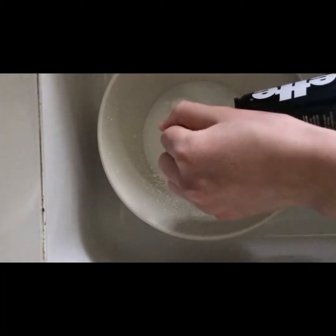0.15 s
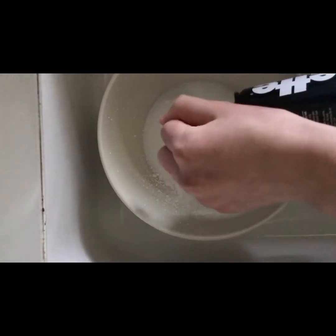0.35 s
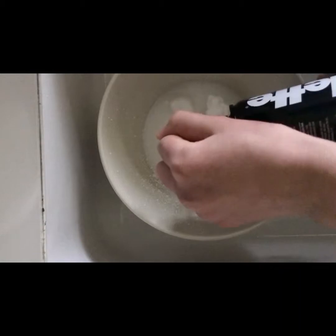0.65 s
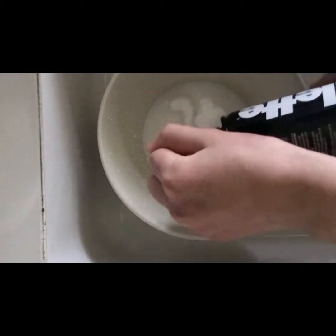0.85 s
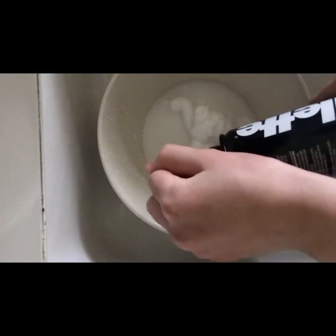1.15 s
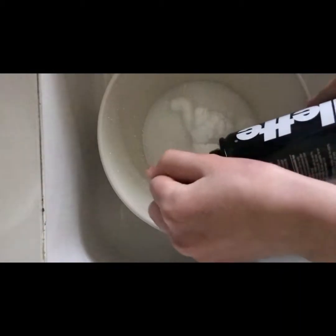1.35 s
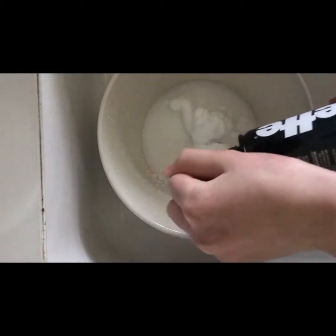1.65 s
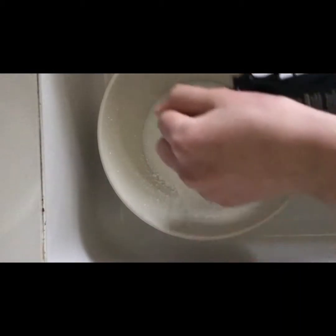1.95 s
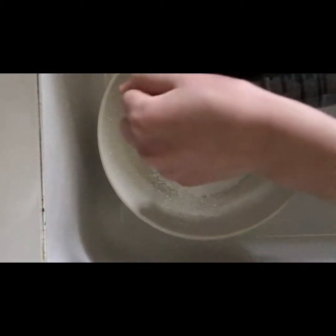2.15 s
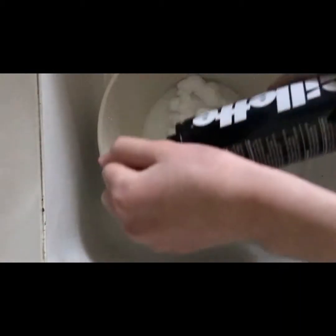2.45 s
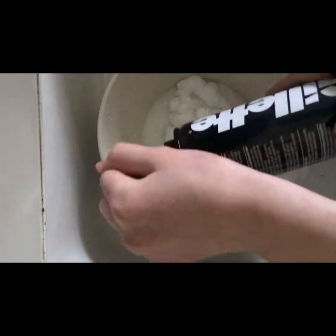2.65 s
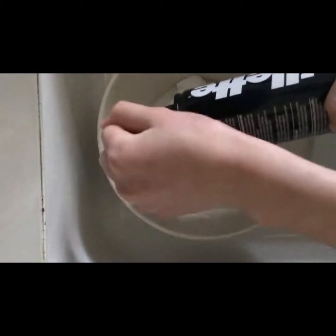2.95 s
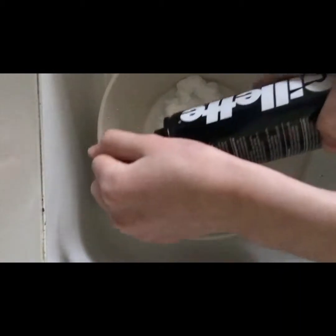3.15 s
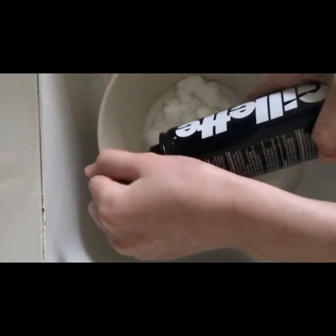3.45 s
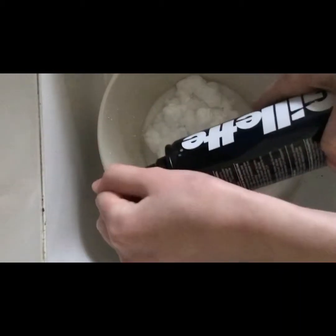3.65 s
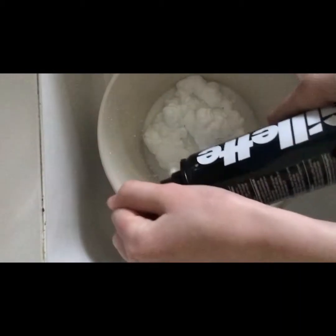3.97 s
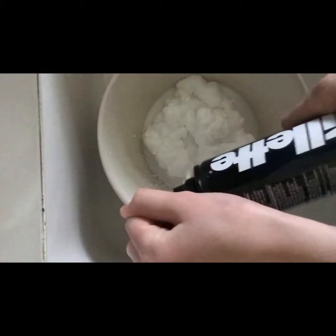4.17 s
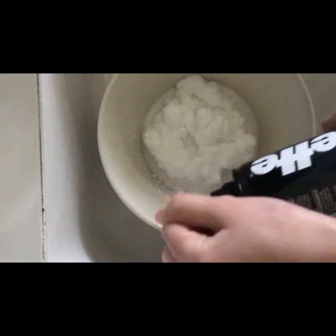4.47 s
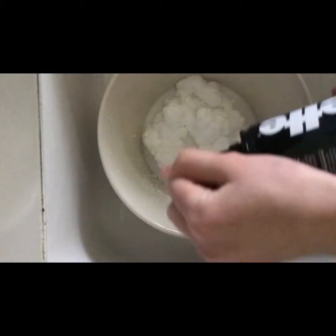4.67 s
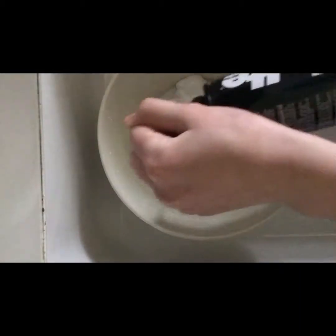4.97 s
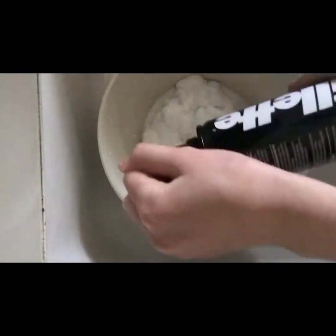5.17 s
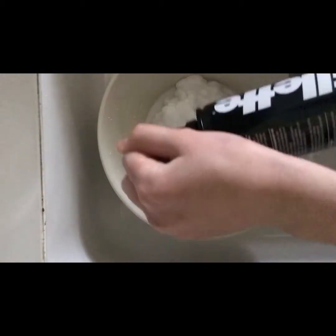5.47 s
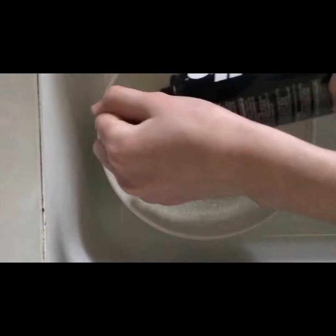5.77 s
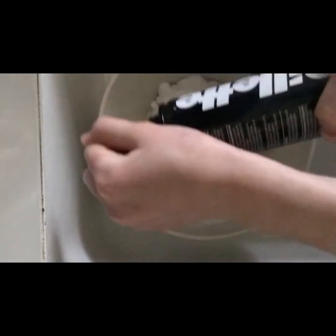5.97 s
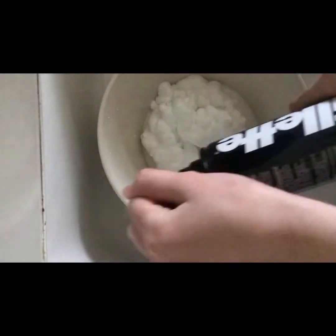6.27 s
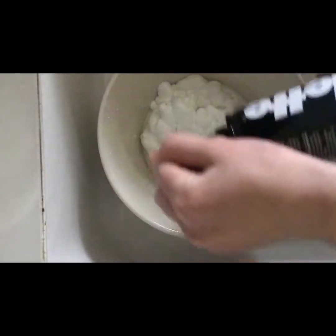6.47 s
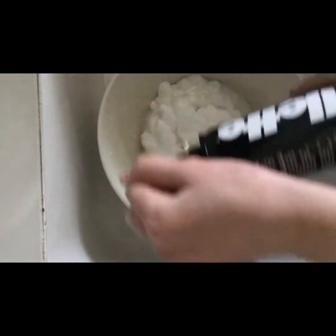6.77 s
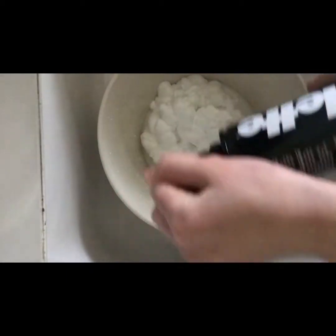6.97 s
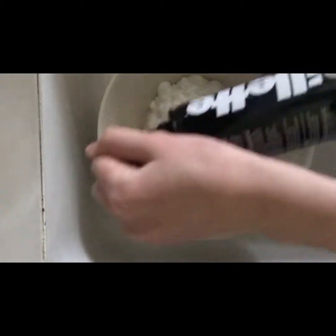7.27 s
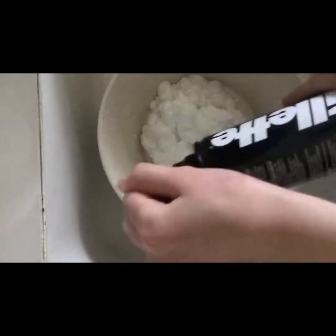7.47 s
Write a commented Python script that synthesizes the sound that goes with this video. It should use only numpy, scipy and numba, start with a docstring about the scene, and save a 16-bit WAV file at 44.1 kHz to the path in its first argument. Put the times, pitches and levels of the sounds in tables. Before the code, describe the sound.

Shaving foam sprays continuously from a can into a bowl in a sink. It is a bright, wet, crackly sputter with fine fizz and sharp spits, densest in the first two seconds. The bowl's hollow ring weakens as foam covers the bottom, and the tone shifts as the hand circles. Close microphone, short hard echoes, faint low hum and air behind.

```python
"""Shaving foam sputters from a spray can in one long spray and piles up in a bowl standing in a sink.
Gas pockets burst out of the nozzle in quick uneven spurts: filtered clicks, pitched by pocket size, over fine fizz.
Sharp spits stand out. The bowl rings along, and moving resonances colour the foam as the hand circles above it.
Behind it are a faint gas hiss, a motor hum of steady tones, moving air and rumble, and brief rubs on the can."""
import sys
import numpy as np
from scipy import signal
from scipy.fft import rfft, irfft, next_fast_len
from scipy.io import wavfile
from scipy.ndimage import uniform_filter1d
from numba import njit

SR = 44100
rng = np.random.default_rng(int(sys.argv[2]) if len(sys.argv) > 2 else 0)


def to_wav(sig):
    """Store sig (one row per channel, or 1-D mono) as 16-bit WAV at the path in sys.argv[1].

    Samples outside -1..1 are clipped; the rate is SR.
    """
    pcm = np.clip(np.atleast_2d(sig), -1, 1) * 32767
    pcm = np.round(pcm).astype(np.int16)
    wavfile.write(sys.argv[1], SR, pcm.T)  # frames by channels


N = 335895


def from_db(db):
    """Turn decibels into a gain."""
    return 10 ** (np.asarray(db) / 20)


def rms_one(x):
    """Scale a sound to an average strength (rms) of 1."""
    return x / np.sqrt(np.mean(x ** 2) + 1e-20)


def in_time(rows):
    """Draw straight lines between the rows of a table: one curve for each column after the time."""
    s, *columns = np.transpose(rows)
    return [np.interp(np.arange(N) / SR, s, column) for column in columns]


def gain_in_time(rows):
    """Turn a table of time and dB into one gain curve."""
    return from_db(in_time(rows)[0])


def swell(s, length_s):
    """A smooth rise to 1 at time s and back to 0."""
    first = max(int((s - length_s / 2) * SR), 0)
    last = min(int((s + length_s / 2) * SR), N)
    near = np.arange(first, last)
    out = np.zeros(N)
    out[near] = np.cos(np.pi * (near / SR - s) / length_s) ** 2
    return out


def wander(per_s):
    """Slow chance ups and downs with rms 1."""
    steps = np.arange(N) / SR * per_s
    return rms_one(np.interp(steps, np.arange(1000), rng.standard_normal(1000)))


def band(x, low_hz, high_hz, order=2):
    """Keep only the pitches between two limits."""
    limits = [low_hz, min(high_hz, SR / 2 - 1)]
    return signal.sosfilt(signal.butter(order, limits, "band", fs=SR, output="sos"), x + 1e-18)


def coloured(x, spectrum):
    """Give x a smooth spectrum and rms 1."""
    hz, db = np.transpose(spectrum)
    size = next_fast_len(N)
    bins = np.maximum(np.arange(size // 2 + 1) * SR / size, 1)
    gains = from_db(np.interp(np.log(bins), np.log(hz), db))
    return rms_one(irfft(rfft(x, size) * gains, size)[:N])


def resonance(x, hz, width_hz):
    """A space that rings at one pitch (two-pole filter, gain 1 on top); a narrow width rings longer."""
    r = np.exp(-np.pi * width_hz / SR)
    inputs = np.array([1, 0, -1]) * (1 - r * r) / 2
    feedback = [1, -2 * r * np.cos(2 * np.pi * hz / SR), r * r]
    return signal.lfilter(inputs, feedback, x + 1e-18)


@njit
def glide(x, turn, r):
    """The same ringing filter with a moving pitch (turn in radians per sample)."""
    y = np.zeros(len(x))
    for i in range(2, len(x)):
        driven = (1 - r * r) / 2 * (x[i] - x[i - 2])
        y[i] = driven + (1 + r * r) * np.cos(turn[i]) * y[i - 1] - r * r * y[i - 2]
    return y


def moving_resonance(x, hz, width_hz):
    """A resonance that follows a pitch curve in Hz."""
    return glide(x, 2 * np.pi * hz / SR, np.exp(-np.pi * width_hz / SR))


def foam():
    """One surging flow drives sputter, fizz and ringing; spits join in, and all but the ringing echoes."""
    *pocket_levels, fizz_level = supply()
    surge = spurts(per_s=130, spread_db=3.5, fade_s=0.0028)
    hiss = from_db(-3.5) * sputter(surge, pocket_levels) + fizz_level * crackle(surge)
    echoed = sink(hiss + spits(), early_db=-5.0, early_t60=0.012, late_db=-8.0, late_t60=0.034)
    return hand_shadow(echoed + ringing(surge))


# Flow through the valve; thinner foam tears into smaller pockets: t/s, flow level/dB, thinness/dB
VALVE_FLOW = [(0.0, 5.5, -16), (0.45, 1, 0.5), (0.85, 1.2, 6), (1.05, 3, 7.5), (1.45, 1.5, 6.5),
              (1.65, 2.5, -2.5), (1.9, 0.3, -1.5), (2.28, 1.5, -6.5), (2.65, 1.6, -12.5), (3.3, -0.65, 8),
              (3.95, 0.2, -6), (4.5, -0.9, 7), (4.9, -0.5, 0.8), (5.25, 2.2, -12), (5.95, -4, 8),
              (6.45, 1.5, -3.5), (6.95, 0.9, -3.5), (7.62, -3, 5)]
# Half-clogged nozzle, nearly always a dip: t/s at the middle, length/s, level change/dB
NOZZLE_CLOGS = [(0.078, 0.072, -3.5), (1.093, 0.035, -4), (1.29, 0.027, -3.5), (2.228, 0.1, -1.5),
                (2.85, 0.043, 1), (3.224, 0.046, -5), (3.6, 0.058, -6), (5.083, 0.07, -4), (5.2, 0.18, -4),
                (5.638, 0.1, -3), (5.91, 0.037, -3), (6.01, 0.063, -3), (6.694, 0.05, -1),
                (7.314, 0.07, -1.5)]
# Gushes of foam, nearly all lifts: t/s at the crest, length/s, level change/dB, f/Hz of most pockets,
# spread/octaves
FOAM_GUSHES = [(0.198, 0.074, 9.5, 4660, 0.34), (0.452, 1.1, 6.5, 2750, 0.095),
               (0.454, 0.045, 9, 4630, 0.29), (0.503, 0.08, 7, 4000, 0.093),
               (0.573, 0.093, 8.5, 4000, 0.13), (0.751, 0.05, 9, 4000, 0.23), (0.87, 0.027, 8, 2630, 0.22),
               (1.01, 0.13, 3, 4900, 0.14), (1.145, 0.04, 6, 3350, 0.25), (1.225, 0.06, 10, 3460, 0.33),
               (1.426, 0.14, 5.5, 3650, 0.6), (1.455, 0.2, 6, 4730, 0.13), (1.642, 0.065, 8, 2680, 0.13),
               (1.742, 0.079, 11, 4480, 0.11), (1.877, 0.31, 10.5, 4430, 0.13),
               (1.95, 0.68, 5, 2750, 0.075), (2.046, 0.12, 11, 4000, 0.074), (2.148, 0.21, 8.5, 4330, 0.12),
               (2.3, 0.11, 2.5, 3200, 0.11), (2.49, 0.36, 9.5, 4930, 0.16), (2.587, 0.1, 6, 3350, 0.21),
               (2.698, 0.24, 11, 4200, 0.19), (2.915, 0.04, 7, 3800, 0.15), (2.955, 0.024, 15, 4600, 0.14),
               (3.03, 0.18, 9, 4240, 0.14), (3.136, 0.03, 8, 3950, 0.13), (3.375, 0.058, 15.5, 3350, 0.13),
               (3.54, 0.014, -4, 3000, 0.5), (3.65, 0.47, 5.5, 3980, 0.087), (3.9, 0.05, 6, 3300, 0.17),
               (3.98, 0.86, 3, 2200, 0.092), (4.052, 0.07, 4.5, 3350, 0.63), (4.12, 0.079, 4, 2200, 0.55),
               (4.323, 0.12, 8, 2920, 0.3), (4.375, 0.086, 9.5, 5100, 0.12), (4.435, 0.14, 10, 2680, 0.31),
               (4.53, 0.55, 5, 4780, 0.081), (4.537, 0.031, 10, 5100, 0.099),
               (4.576, 0.069, 8.5, 2360, 0.2), (4.688, 0.2, 6.5, 5200, 0.13),
               (4.662, 0.12, 7.5, 2480, 0.25), (4.76, 0.094, 3.5, 2510, 0.35),
               (4.782, 0.075, 12, 3350, 0.25), (4.984, 0.16, 7.5, 3000, 0.12), (5.15, 0.32, 4, 3350, 0.081),
               (5.572, 1.06, 5.5, 3350, 0.21), (5.809, 0.13, 9, 3540, 0.41), (5.87, 0.064, 9, 5260, 0.18),
               (6.15, 1.4, 3, 2200, 0.1), (6.079, 0.078, 10, 3700, 0.12), (6.257, 0.2, 7.5, 3660, 0.11),
               (6.4, 0.045, 6.5, 3650, 0.64), (6.51, 0.16, 7.5, 3670, 0.31),
               (6.772, 0.045, 17.5, 5200, 0.16), (6.845, 0.43, 8.5, 3180, 0.089),
               (7, 0.18, 8.5, 5280, 0.15), (7.085, 0.1, 10, 4000, 0.12), (7.101, 0.093, 9, 2990, 0.12),
               (7.225, 0.28, 9.5, 3200, 0.11), (7.263, 0.06, 7, 5150, 0.26), (7.54, 0.62, 10.5, 3676, 0.11)]
# Pocket sizes, large to small, then the finest fizz: f/Hz, level/dB, share of the flow's swing,
# share of the thinness
POCKET_SIZES = [(2210, -49.5, 0.54, 0.048), (2750, -53, 2.2, 0.14), (3350, -52.5, 0.56, -0.35),
                (3980, -51, 2.06, 0.29), (4780, -52.5, 2.06, 0.59), (5960, -62.5, 1.7, 0.43)]
UNEVEN_DB, UNEVEN_PER_S = 2, 24  # rms of the chance swings in each size's supply; new values per second


def supply():
    """The gain of each pocket size follows flow and thinness, clogs, and gushes near its own pitch."""
    flow_db, thin_db = in_time(VALVE_FLOW)
    flow_db = flow_db + sum(db * swell(s, length_s) for s, length_s, db in NOZZLE_CLOGS)
    _, _, lift_db, gush_hz, octaves = np.transpose(FOAM_GUSHES)
    size_hz = np.array(POCKET_SIZES)[:, :1]
    nearness = np.exp(-.5 * (np.log2(size_hz / gush_hz) / octaves) ** 2)
    # the size nearest to a gush's pitch gets its whole change
    shares_db = lift_db * nearness / nearness.max(axis=0)
    gushes_db = shares_db @ np.array([swell(s, length_s) for s, length_s, *_ in FOAM_GUSHES])
    gains = []
    for (_, level_db, follows, thins), gush_db in zip(POCKET_SIZES, gushes_db):
        steady_db = level_db + follows * flow_db + thins * thin_db
        gains.append(from_db(steady_db + gush_db + UNEVEN_DB * wander(UNEVEN_PER_S)))
    return gains


def spurts(per_s, spread_db, fade_s):
    """Gas power from uneven pockets: each opens at once and empties; the valve holds the mean near 1."""
    born = rng.random(N) < per_s / SR
    sizes = from_db(spread_db * np.clip(rng.standard_normal(N), -2, 2)) ** 2
    power = signal.lfilter([1], [1, -np.exp(-2 / (fade_s * SR))], born * sizes + 1e-9)
    return power / uniform_filter1d(power, SR // 16)


def tearing(power, films_per_s):
    """Foam films snap as tiny random clicks, as strong as the gas flow behind them."""
    snaps = rng.random(N) < films_per_s / SR
    return np.sqrt(power) * snaps * rng.standard_normal(N)


TICKS_PER_S, TICK_RANGE_DB, TICK_DB = 150, 18, -4  # rate, spread of strengths, level against the tearing


def ticks():
    """Skins of foam burst at random, each with one crisp click that reaches all sizes at once."""
    bursts = rng.random(N) < TICKS_PER_S / SR
    strengths = from_db(-TICK_RANGE_DB * rng.random(N)) * rng.choice([-1, 1], N)
    return band(bursts * strengths, POCKET_BANDS[0][0], POCKET_BANDS[-1][1], order=3)


def bubbles(low_hz, high_hz, per_s, cycles, count=8):
    """Single bubbles burst and ring for a few cycles, each at one of several pitches."""
    strengths = from_db(-12 * rng.random(N))
    clicks = (rng.random(N) < per_s / SR) * strengths
    dealt = rng.integers(0, count, N)  # which pitch each bubble gets
    pitches = np.geomspace(low_hz, high_hz, count + 2)[1:-1]
    return rms_one(sum(resonance(clicks * (dealt == k), hz, hz / cycles) for k, hz in enumerate(pitches)))


# Fixed resonances of can and bowl: f/Hz, width/Hz, boost level/dB
CAN_AND_BOWL = [(2300, 80, 3), (2580, 110, 5), (2720, 90, 2), (2920, 110, 3), (3140, 120, 4), (3310, 70, 3),
                (3510, 80, 4), (4350, 110, 3), (5010, 140, 3), (5330, 80, 8), (6450, 130, 3)]


def hollows(x):
    """The spaces around the nozzle lift their own pitches."""
    for hz, width_hz, boost_db in CAN_AND_BOWL:
        x = x + (from_db(boost_db) - 1) * resonance(x, hz, width_hz)
    return x


def pockets(surge, clicks, low_hz, high_hz, pops_db, count):
    """One size class: foam tears partly with the common surge, partly alone; bubbles and skins burst in it."""
    edges, torn = np.geomspace(low_hz, high_hz, count + 1), 0
    together = 0.45  # share of the flow that all sizes have in common
    kin = spurts(per_s=150, spread_db=1.0, fade_s=0.0038)
    for low, high in zip(edges, edges[1:]):
        own = spurts(per_s=1500, spread_db=0.5, fade_s=0.008)
        flow = together * surge + (1 - together) * kin * own
        # a pocket takes about a millisecond to open
        power = np.abs(uniform_filter1d(flow, SR // 650))
        torn = torn + band(tearing(power, films_per_s=7000), low, high)
    pops = band(bubbles(low_hz, high_hz, per_s=140, cycles=12.0), low_hz, high_hz, order=1)
    skins = rms_one(band(clicks, low_hz, high_hz, order=1))
    return hollows(rms_one(torn) + from_db(pops_db) * pops + from_db(TICK_DB) * skins)


# The band in which each size tears: low f/Hz, high f/Hz, level/dB of single pops against the tearing
POCKET_BANDS = [(2016, 2530, -4), (2455, 3120, -19.5), (2915, 3550, -16.5), (3702, 4314, -18),
                (4370, 5110, -5.5)]
# Five moving resonances of the space under the circling hand, low to high; each a list of: t/s, f/Hz
HAND_PITCHES = [
    [(0, 2120), (1.7, 2206), (2.7, 2245), (3.3, 2175), (4.1, 2230), (4.65, 2045), (5.3, 2160), (5.95, 2150),
     (6.45, 2116), (7, 2070), (7.62, 2200)],
    [(0, 2870), (1.1, 2840), (1.65, 2460), (2.05, 2600), (3.2, 2520), (4.4, 2480), (5, 2770), (5.5, 2800),
     (7.62, 2800)],
    [(0, 3280), (2.3, 3250), (2.6, 3360), (4.8, 3350), (5.3, 3260), (5.8, 3200), (6.4, 3130), (7.62, 3150)],
    [(0, 4230), (.5, 4120), (1.1, 3900), (1.75, 3980), (2.1, 4040), (2.7, 3870), (4.8, 3900), (6.3, 3980),
     (7.62, 3850)],
    [(0, 4640), (.5, 4430), (.83, 5140), (1.03, 5260), (1.22, 4500), (1.45, 4360), (1.95, 4720),
     (2.7, 4760), (3.3, 4840), (4.35, 4560), (4.55, 4780), (7.62, 4780)],
]
# How those five ring: width/Hz, boost level/dB in the empty bowl, boost level/dB in the full bowl
HAND_RINGING = [(128, 12, 21), (200, 6, 8), (210, -6, 4), (190, 16, 6.5), (295, 8, 9)]
FILL_S = 9.4  # the heap grows steadily and would fill the bowl at this time


def sputter(surge, levels):
    """Each pocket size excites one moving resonance of the space under the hand."""
    filled, out = np.minimum(np.arange(N) / SR / FILL_S, 1), 0
    clicks = ticks()
    for tears, level, pitch, rings in zip(POCKET_BANDS, levels, HAND_PITCHES, HAND_RINGING):
        low_hz, high_hz, pops_db = tears
        width_hz, empty_db, full_db = rings
        x = pockets(surge, clicks, low_hz, high_hz, pops_db, count=2)
        boost = from_db(empty_db + (full_db - empty_db) * filled)
        x = x + (boost - 1) * moving_resonance(x, in_time(pitch)[0], width_hz)
        # the flow through the valve sets the loudness, whatever the resonance does
        loudness = np.sqrt(np.abs(uniform_filter1d(x * x, SR // 18)) + 1e-20)
        out = out + level * x / loudness
    return out


# Spectrum of the fizz: f/Hz, relative level/dB per Hz
FIZZ_COLOUR = [(4000, -35), (5600, 12.5), (6700, 8.5), (7500, 2.5), (9000, -0.5), (11000, -8), (13000, -10),
               (16000, -9)]


def crackle(surge, count=7):
    """Fizz: the finest bubbles burst in clusters, each pitch band largely on its own."""
    edges, out = np.geomspace(5200, 16000, count + 1), 0
    clusters = spurts(per_s=170, spread_db=0.0, fade_s=0.0092)
    for low, high in zip(edges, edges[1:]):
        own = spurts(per_s=200, spread_db=15.0, fade_s=0.023)
        # a cluster takes a few milliseconds to build up
        power = np.abs(uniform_filter1d(clusters * own, SR // 130))
        out = out + band(tearing(power * (surge + 0.25), films_per_s=9200), low, high)
    return rms_one(hollows(coloured(out, FIZZ_COLOUR)))


def bowl(surge, modes):
    """The sputter keeps a set of air resonances ringing."""
    drive = tearing(surge + 1.95, films_per_s=5000)
    rings = sum(from_db(db) * resonance(drive, hz, width_hz) for hz, width_hz, db in modes)
    return rms_one(band(rings, modes[0][0] * 0.944, modes[-1][0] * 1.232, order=4))


# Air resonances of bowl and sink, in three groups: f/Hz, width/Hz, relative level/dB
DEEP_AIR = [(797.3, 9.3, 12), (829, 31, 14), (894, 125, -1)]
UPPER_AIR = [(1051, 58, 3), (1304, 220, 2.5), (1475, 46, 11.5), (1797, 185, 7)]
SINK_AIR = [(507.3, 37, 0), (567.7, 35, 0)]
# How loud each group rings; foam covering the bottom damps the deep one: t/s, level/dB
DEEP_LEVEL = [(0, -51), (1.1, -52), (2.15, -54), (2.55, -58), (2.85, -57.5), (3.7, -62), (4.55, -61),
              (4.98, -55.5), (5.25, -61), (6.2, -62), (7.1, -60), (7.45, -68)]
UPPER_LEVEL = [(0, -52), (.95, -56.5), (1.3, -51), (2.05, -55.5), (2.3, -55.5), (3.05, -58), (3.8, -57),
               (4.35, -56), (4.6, -56), (5.65, -59), (5.9, -55.5), (6.45, -55), (6.7, -55), (7, -52.5),
               (7.35, -57), (7.62, -52)]
SINK_LEVEL = [(0, -63.5), (1, -63), (3.8, -61.5), (4.6, -64.5), (7.62, -66)]


def ringing(surge):
    """Bowl and sink ring with the flow; foam over the bottom weakens the bowl's deep ring unevenly."""
    deep = gain_in_time(DEEP_LEVEL) * bowl(surge, DEEP_AIR)
    upper = gain_in_time(UPPER_LEVEL) * bowl(surge, UPPER_AIR)
    return deep + upper + gain_in_time(SINK_LEVEL) * bowl(surge, SINK_AIR)


# The pitch that the echo from the hand cancels: t/s, f/Hz, depth (0 none, 1 whole)
HAND_ECHO = [(0, 1470, 0.9), (.9, 1435, 0.8), (1.8, 1330, 0.34), (2.2, 1130, 0.8), (2.45, 1120, 1),
             (2.7, 1050, 0.1), (3.05, 1080, 0.8), (3.45, 1780, 0.1), (4.05, 1780, 1), (5.2, 1120, 0.47),
             (6, 1900, 0.57), (6.7, 1410, 0.6), (7.62, 1600, 0.8)]


def hand_shadow(x):
    """The hand's echo cuts a moving gap into the spectrum."""
    hz, depth = in_time(HAND_ECHO)
    return x - depth * moving_resonance(x, hz, width_hz=400)


# Spectrum of the gas hiss: f/Hz, relative level/dB per Hz
GAS_COLOUR = [(3000, 12.3), (7000, 12.2), (10000, 2.1), (12000, 1), (14000, 4.9), (16000, 8.4)]


def propellant():
    """A faint smooth hiss of gas that weakens steadily as the can cools."""
    level = from_db(-58.0 - 0.44 * np.arange(N) / SR)  # loses 0.44 dB each second
    return level * coloured(rng.standard_normal(N), GAS_COLOUR)


# Steady tones of the motor: f/Hz, rms level/dB
MOTOR_TONES = [(90, -69), (99.7, -68.5), (120, -58)]
# Spectra of the room's air and of its rumble: f/Hz, relative level/dB per Hz
AIR_COLOUR = [(15, -51), (33, -24), (48, -6), (75, 4), (100, 1.5), (150, -3.5), (185, -5.5), (215, 3.5),
              (238, 0.5), (260, 6.5), (295, 3.5), (380, -6), (700, -21), (3000, -32.5)]
RUMBLE_COLOUR = [(15, -45), (30, -38), (45, 15.5), (70, -10), (85, 23), (110, 4), (130, 25), (150, -41),
                 (400, -35)]
# A low rumble that swells in the room: t/s, level/dB
RUMBLE_SWELL = [(0, -104), (3.4, -80), (4.5, -63), (5.8, -64), (6.3, -56), (6.5, -51), (6.7, -86),
                (7.1, -59), (7.62, -60)]


def room():
    """Motor hum from sine tones; moving air and a low rumble from filtered noise."""
    t = np.arange(N) / SR
    hum = 0
    for hz, db in MOTOR_TONES:
        hum = hum + np.sqrt(2) * from_db(db) * np.sin(2 * np.pi * (hz * t + rng.random()))
    air = from_db(-58.5) * coloured(rng.standard_normal(N), AIR_COLOUR)
    rumble = gain_in_time(RUMBLE_SWELL) * coloured(rng.standard_normal(N), RUMBLE_COLOUR)
    return hum + air + rumble


def sink(x, early_db, early_t60, late_db, late_t60, count=26):
    """Close echoes from the bowl, later ones from sink and walls; their pattern changes as the can moves."""
    t, out = np.arange(SR // 5) / SR, x.copy()
    early = from_db(-60 * t / early_t60) * (t > .0012)
    late = from_db(-60 * t / late_t60) * (t > .006)
    decay = from_db(early_db) * early / np.linalg.norm(early)
    decay = decay + from_db(late_db) * late / np.linalg.norm(late)
    place = np.linspace(0, count - 1, N)
    for k in range(count):
        # each place has its own echo pattern and fades into the next
        near = np.flatnonzero(np.abs(place - k) < 1)
        part = x[near] * np.cos((place[near] - k) * np.pi / 2)
        echo = signal.fftconvolve(part, decay * rng.standard_normal(len(t)))[:N - near[0]]
        out[near[0]:near[0] + len(echo)] += echo
    return out


# The loudest spits: t/s, level/dB before snap and puff are set, f/Hz, length/s
LOUD_SPITS = [(0.0173, -25.5, 3770, 0.002), (0.1045, -21.5, 3350, 0.0042), (0.1709, -27.5, 2790, 0.01),
              (0.2498, -25.5, 3880, 0.002), (0.398, -24.5, 3150, 0.0032), (0.4199, -26.0, 4310, 0.002),
              (0.454, -27.0, 4340, 0.0033), (0.5064, -29.0, 2790, 0.0068), (0.526, -29.5, 3980, 0.0026),
              (0.7475, -29.0, 3080, 0.0107), (0.8413, -28.0, 3720, 0.002), (1.0051, -23.0, 5010, 0.004),
              (1.0259, -25.5, 4870, 0.0102), (1.092, -26.0, 4390, 0.0051), (1.1091, -27.0, 3900, 0.0031),
              (1.1244, -21.5, 4050, 0.0081), (1.1329, -23.5, 3800, 0.0033), (1.228, -27.0, 3880, 0.012),
              (1.2425, -19.0, 4490, 0.0061), (1.2676, -23.5, 4530, 0.0044), (1.3081, -26.5, 4590, 0.0038),
              (1.3273, -27.5, 4030, 0.0068), (1.3589, -25.0, 4320, 0.002), (1.4164, -25.0, 3950, 0.0109),
              (1.4254, -19.5, 4540, 0.0026), (1.4561, -24.5, 4570, 0.002), (1.4721, -25.5, 4730, 0.0048),
              (1.5023, -25.0, 4610, 0.002), (1.5549, -24.5, 4060, 0.002), (1.6518, -28.0, 2500, 0.0087),
              (1.7422, -23.0, 4460, 0.0027), (1.7633, -27.0, 3790, 0.0041), (1.8822, -25.0, 4530, 0.0033),
              (1.941, -28.0, 3990, 0.0058), (2.4014, -27.0, 3880, 0.0061), (2.5717, -26.0, 3620, 0.0056),
              (2.5891, -28.0, 2620, 0.0045), (2.6571, -24.0, 3080, 0.002), (2.7144, -25.0, 3990, 0.0046),
              (2.7698, -28.0, 4060, 0.002), (2.8246, -31.0, 3570, 0.0105), (2.9912, -29.5, 3480, 0.0057),
              (3.0454, -29.5, 4890, 0.0043), (4.122, -30.5, 2330, 0.0066), (4.2301, -30.0, 3480, 0.011),
              (4.3214, -27.5, 2480, 0.002), (4.3327, -27.5, 3150, 0.002), (4.3487, -27.5, 4700, 0.0051),
              (4.3778, -26.0, 4140, 0.002), (4.5395, -24.0, 4970, 0.0067), (4.6592, -29.0, 4740, 0.004),
              (4.7924, -28.5, 3840, 0.0062), (4.9984, -30.5, 2840, 0.0101), (5.151, -31.0, 3200, 0.0059),
              (5.3714, -28.5, 3180, 0.0052), (5.3896, -27.5, 3260, 0.002), (6.1393, -28.5, 3460, 0.0045),
              (6.1485, -29.5, 4810, 0.0025), (6.2754, -30.5, 3870, 0.0049), (6.3043, -27.0, 4030, 0.0042),
              (6.3879, -26.0, 3430, 0.002), (6.4006, -26.5, 3030, 0.0058), (6.7573, -28.5, 3200, 0.0042),
              (6.778, -23.0, 3200, 0.0076), (6.9574, -27.5, 4510, 0.01), (6.9676, -22.5, 4310, 0.0024),
              (7.1759, -30.5, 3170, 0.0065), (7.2691, -30.0, 4740, 0.0037), (7.3412, -31.0, 3060, 0.0072),
              (7.3594, -26.0, 3600, 0.002), (7.4881, -29.5, 3940, 0.0056)]
SEEP = 0.1  # gas seeps ahead of the snap, building up over this share of the spit's length
SNAP_DB, PUFF_DB, PUFF_SPLASH_DB = -3.5, -11.5, -5.5  # snap; puff; the puff's broad share against its pitch
SNAP_WIDTH = 1.1  # the snap's band reaches this ratio above and below the pitch


def spits():
    """The plug gives way with a sharp snap at the pocket's pitch, and the gas puffs out behind it."""
    out, t = np.zeros(N + SR), np.arange(-SR // 100, SR // 20) / SR
    for s, level_db, hz, length_s in LOUD_SPITS:
        snap = band(1.0 * (t == 0), hz / SNAP_WIDTH, hz * SNAP_WIDTH)
        gas = rng.standard_normal(len(t))
        pitched = rms_one(band(gas, hz * 0.935, hz * 1.087))
        splash = rms_one(band(gas, 1890, 4800, order=3))
        puff = pitched + from_db(PUFF_SPLASH_DB) * splash
        envelope = np.exp(-np.maximum(t, -t / SEEP) / length_s)
        spit = from_db(SNAP_DB) * snap / np.abs(snap).max() + from_db(PUFF_DB) * envelope * puff
        # the snap's peak falls on the given time
        start = max(round(s * SR) - np.argmax(np.abs(snap)), 0)
        out[start:start + len(t)] += from_db(level_db) * spit
    return out[:N]


# The grip shifts on the can: t/s at the crest, length/s, level/dB
GRIP_SHIFTS = [(1.782, 0.88, -58), (4.325, 0.28, -51.5)]
# Spectrum of rubbing skin: f/Hz, relative level/dB per Hz
SKIN_COLOUR = [(100, -39), (250, -2), (370, -8), (560, -3), (750, -18), (1300, -10.5), (3000, -31)]


def grip():
    """Skin rubs briefly on the can: soft noise that swells and fades."""
    level = sum(from_db(db) * swell(s, length_s) for s, length_s, db in GRIP_SHIFTS)
    return level * coloured(rng.standard_normal(N), SKIN_COLOUR)


def scene():
    """The spray in the sink, and the room behind it."""
    return (foam() + propellant() + room() + grip())[None]


def record(dry):
    """Cut the top steeply above 15750 Hz."""
    steep = signal.ellip(14, .1, 90, 15750, fs=SR, output="sos")  # 0.1 dB ripple, 90 dB cut
    return signal.sosfilt(steep, dry)


dry = scene()
out = record(dry)
to_wav(out)
```